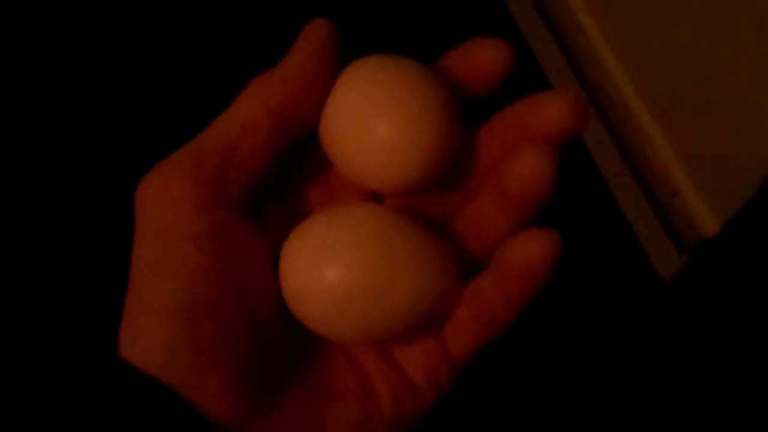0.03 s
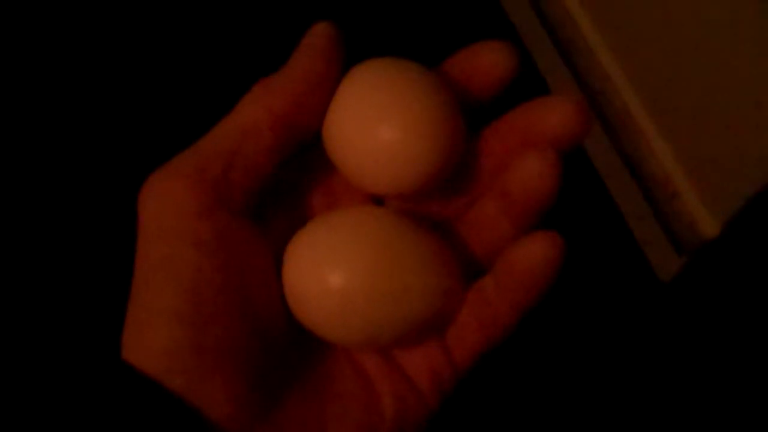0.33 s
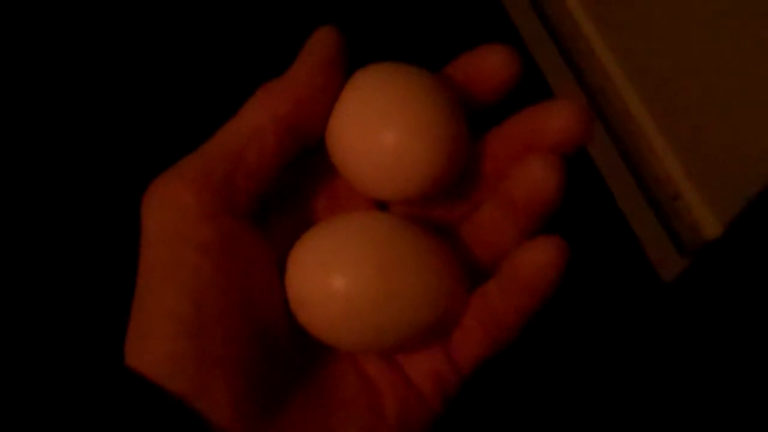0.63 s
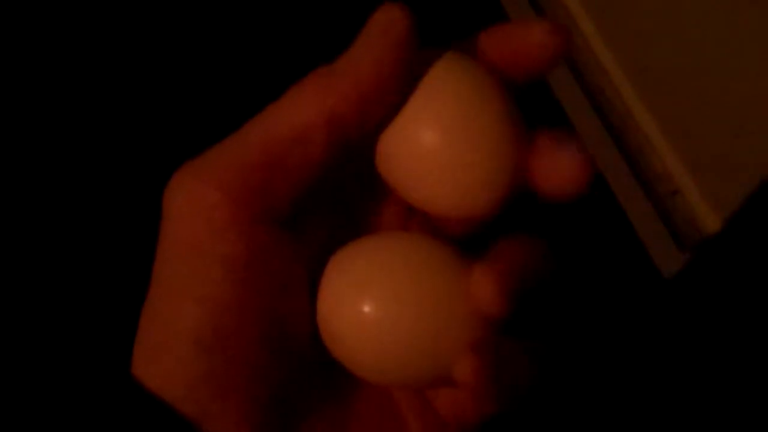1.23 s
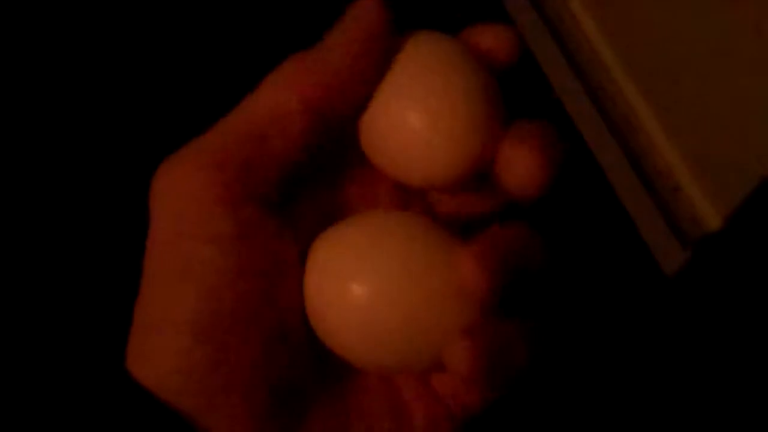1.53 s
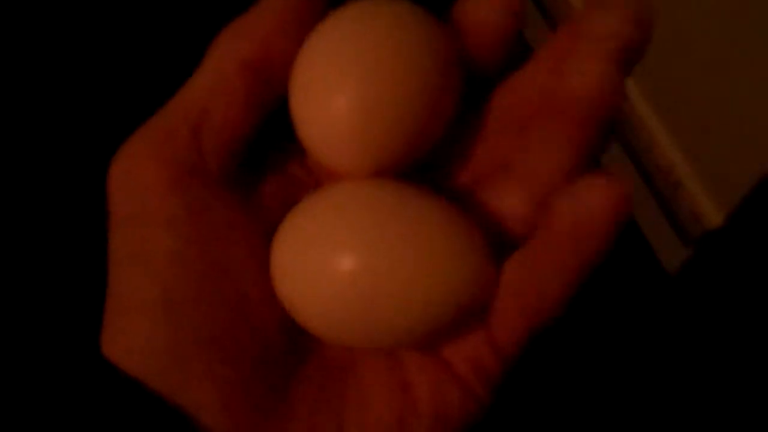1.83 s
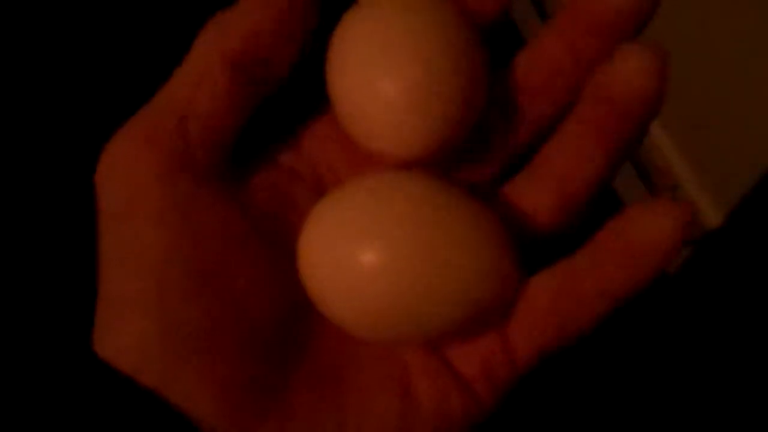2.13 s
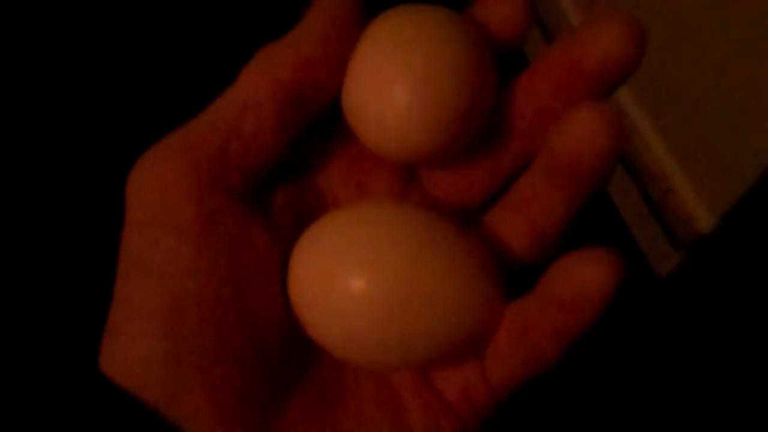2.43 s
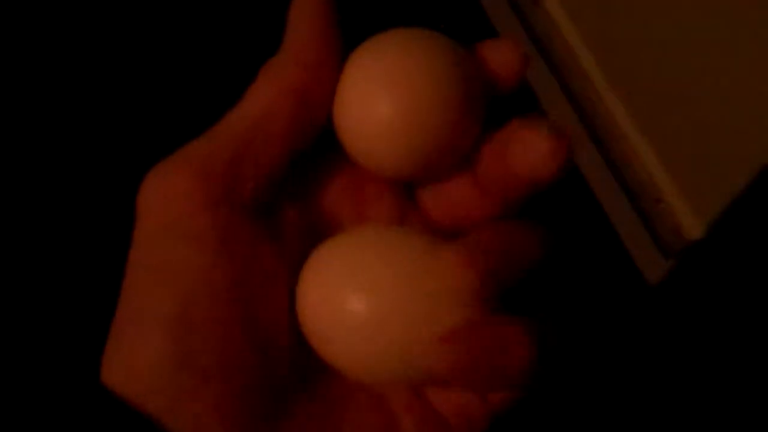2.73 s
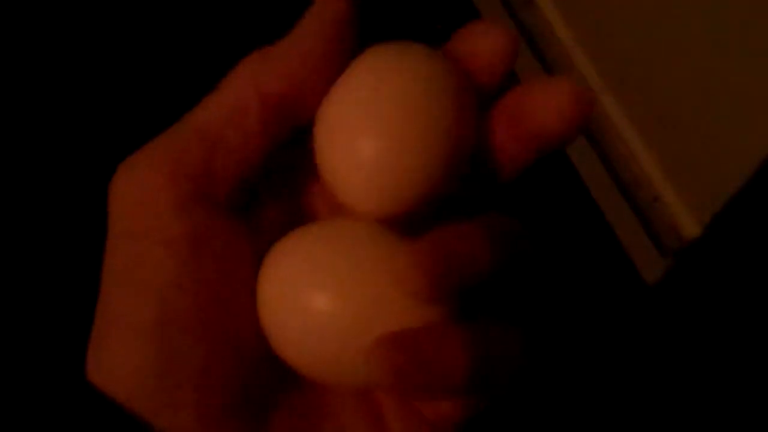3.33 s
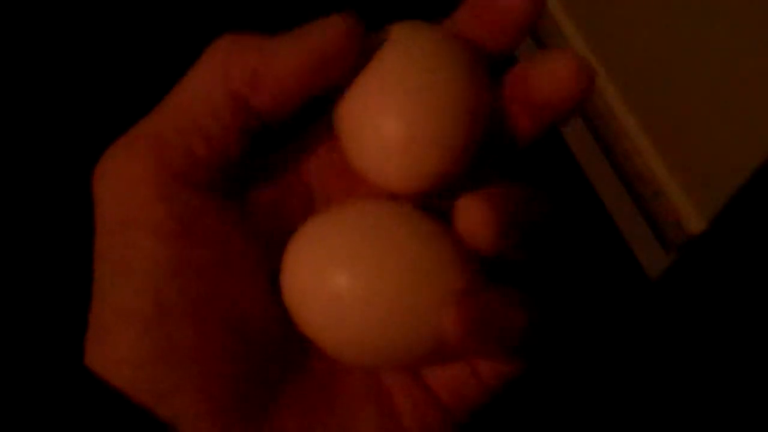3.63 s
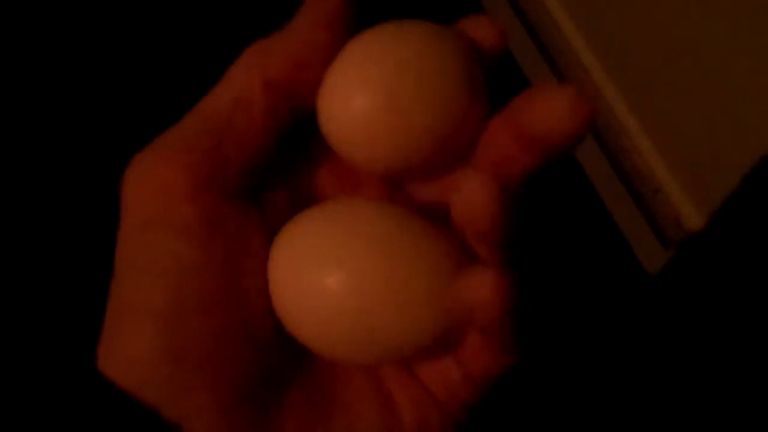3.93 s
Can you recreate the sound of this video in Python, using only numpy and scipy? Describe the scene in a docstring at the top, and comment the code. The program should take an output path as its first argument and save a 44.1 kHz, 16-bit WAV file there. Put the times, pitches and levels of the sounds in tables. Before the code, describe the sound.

Two eggs click together three times in a hand, with faint rubbing over quiet hiss.

```python
"""A small quiet room, two eggs rolled in one hand close to a stereo microphone.
From the start there is steady hiss, a motor's hum and, farther off, a faint squeak twice a second.
At 1.5 s the shells rub faintly; at 1.8 s they knock: a few quick contacts ring the damped shells and
come back from nearby surfaces. After a second knock at 2.5 s the eggs slide on and come to rest.
The hardest knock falls at 3.4 s, followed by one last rub."""
import sys
import numpy as np
from scipy import signal
from scipy.fft import rfft, irfft
from scipy.io import wavfile

SR = 44100
rng = np.random.default_rng(int(sys.argv[2]) if len(sys.argv) > 2 else 0)


def store_wav(level_fs):
    """Save 16-bit WAV to argv[1]."""
    pcm = np.round(np.clip(np.atleast_2d(level_fs), -1, 1) * 32767)
    wavfile.write(sys.argv[1], SR, pcm.T.astype(np.int16))


N = 176400
TIME = np.arange(N) / SR
FREQS = np.maximum(np.fft.rfftfreq(N, 1 / SR), 1)

# room tone, air noise and hiss: f/Hz, left density/dB, right density/dB
HISS_SPECTRUM = [(30, -92.5, -99), (70, -94.5, -99), (123, -89.5, -94), (162, -78, -81), (223, -84, -87),
                 (388, -74.5, -74.5), (586, -83, -83.5), (690, -79, -77), (1050, -79.5, -80.5),
                 (1170, -83, -82), (1810, -81, -84.5), (2850, -86.5, -88.5), (5750, -90, -93),
                 (6980, -83, -89), (7620, -81, -94.5), (8440, -93, -101), (10300, -102, -103.5),
                 (14200, -105, -106), (14600, -135, -135)]
# how alike the hiss is on the two sides: f/Hz, correlation (-1 to 1)
HISS_LIKENESS = [(60, 0.58), (130, 0.92), (640, 0.96), (1410, 0.54), (3100, -0.2), (6820, -0.43),
                 (12000, 0.069)]
# motor and mains in the background: f/Hz, level/dB, unsteady share (0 to 1), width/Hz, left-right/dB
HUM_TONES = [(99.9, -63.5, 0.11, 3, 4), (169.7, -50.5, 0.45, 7, 3.5), (200.8, -65.5, 0.6, 2.9, 0),
             (249, -65, 0.33, 8.2, 5), (337.5, -52.5, 0.32, 5.4, 3), (505, -61, 0.4, 3, 5),
             (744.5, -63, 0.83, 9.6, 2.5), (859, -60, 0.27, 12, 0), (901, -58.5, 0.77, 5.1, -0.5),
             (965, -59, 1, 9.3, -5.5)]
# something turning, farther off: middle t/s, length/s, level/dB, f/Hz
TURNING_SQUEAKS = [(.298, 0.031, -47, 1100), (0.812, 0.027, -40, 1082), (0.856, 0.018, -47, 1090),
                   (1.320, 0.013, -39.5, 1037), (1.346, 0.027, -50, 1044), (1.843, 0.035, -42, 1019),
                   (2.356, 0.031, -45, 1070), (2.865, 0.022, -42, 1057), (3.387, 0.032, -45, 1058),
                   (3.90, 0.055, -50.5, 1082)]
# surfaces near the microphone: delay/s, left level/dB, right level/dB
NEAR_ECHOES = [(.0078, -11, -14), (.0092, -18, -20), (0.0133, -23, -19)]
# left and right capsule: resonance f/Hz, width/Hz, boost/dB, level/dB, roll-off f/Hz
MIC_CAPSULES = [(7880, 1330, 9, -3, 19000), (6424, 1600, 5, -7, 10000)]
# shell rubs on shell or skin: middle t/s, length/s, level/dB, skin against shell/dB
RUB_STROKES = [(1.48, .035, -58, -15), (1.56, .018, -51.5, -18), (2.628, .004, -49, -12),
               (2.667, 0.021, -52, 0.5), (2.701, .004, -53, 7), (2.745, 0.029, -53.5, 2.5),
               (2.86, 0.06, -58, -6), (3.655, 0.023, -50.5, -18)]
# the eggs slide to rest after the second knock: start t/s, t60/s, level/dB, skin against shell/dB
SETTLING_SLIDES = [(2.53, .19, -42.5, -7), (2.54, 1.1, -54, -2)]
# what the eggs ring with: f/Hz, level/dB, t60/s
SHELL_MODES = [(680, -24, 0.005), (970, -17.7, 0.0037), (2000, -15.3, .0026), (3050, -21, 0.0058),
               (4310, -14, 0.0048), (4770, -17, 0.0053), (5970, -8, 0.0027), (7190, -9.5, 0.0055),
               (7890, -14.5, 0.005), (9560, -6.5, 0.0013), (10670, -14, 0.0035), (11663, -17, 0.0013)]
# shell meets shell, close up: t/s, level/dB, low modes/dB, top modes/dB, pitch factor
SHELL_CONTACTS = [(1.77991, -5.5, 3, -2, 0.94), (1.78102, -0.5, 4.5, -9.6, 0.96),
                  (1.78157, -8.5, 1, -5.4, .987), (2.52970, -17.5, -2, 17, 1), (2.531, -18, -4, 5, 1.1),
                  (2.5334, -19.5, -4, 7, 1), (2.5367, -1.5, -18, -19, .97), (2.5374, -17, -5, -8, 1.02),
                  (3.416091, -4, 11, 5, 1.025), (3.416246, 4, 1.4, 0, 1.049),
                  (3.417271, -0.5, 4.9, -4, 1.064)]

EARLY_DB, EARLY_T60_S, ROOM_DB, ROOM_T60_S, WALL_CUT_HZ = -12, 0.1, -14, 0.24, 3600
SQUEAK_ROOM_DB, SQUEAK_ROUGHNESS = -5, 0.4
RUB_GRAINS_PER_S, RUB_SPREAD_DB = 2500, 3
SHELL_RUB_HZ, SKIN_RUB_HZ = (5900, 8100), (2000, 3980)
GRIT_DB, GRIT_HZ = -8.5, (9000, 13500)  # the fine top of shell friction
LOW_MODES_HZ, TOP_MODES_HZ, HAND_CUT_HZ = 5000, 9500, 400
CRUNCH_DB, CRUNCH_T60_S, CRUNCH_HZ = -25, 0.004, (1490, 13000)  # level against the contact


def from_db(db):
    """Decibels to gain."""
    return 10 ** (np.asarray(db) / 20)


def rms_one(x):
    """Scale to rms 1."""
    return x / np.sqrt(np.mean(x ** 2) + 1e-20)


def over_hz(rows):
    """Spread a table's columns over all frequencies, on a log axis."""
    hz, *columns = np.transpose(rows)
    return np.array([np.interp(np.log(FREQS), np.log(np.sort(hz)), column) for column in columns])


def band(x, edges_hz):
    """Band-pass, rms 1."""
    return rms_one(signal.sosfilt(signal.butter(2, edges_hz, "band", fs=SR, output="sos"), x + 1e-18))


def drift(rate_hz):
    """Random wander, mostly slower than rate_hz, rms 1."""
    return rms_one(irfft(rfft(rng.standard_normal(N)) / (1 + (FREQS / rate_hz) ** 2), N))


def swell(middle, length):
    """A smooth rise and fall."""
    return np.exp(-2 * ((TIME - middle) / length) ** 2)


def fade(t, t60):
    """A sudden start at t = 0 and a steady decay."""
    return (t >= 0) * np.exp(-np.log(1000) * np.maximum(t, 0) / t60)


def hiss():
    """Room tone: smooth noise, alike on both sides in the bass and wide in the treble."""
    alike = over_hz(HISS_LIKENESS)[0]
    mid, side = rfft(rng.standard_normal((2, N)))
    pair = np.sqrt(1 + alike) * mid + np.sqrt(1 - alike) * side * np.array([[1], [-1]])
    return irfft(pair * from_db(over_hz(HISS_SPECTRUM)), N) * np.sqrt(SR) / 2


def motor_hum():
    """Motor and mains in the background: each tone has a steady part and a wavering part."""
    out = 0
    for hz, db, unsteady, width_hz, pan_db in HUM_TONES:
        phase = 2 * np.pi * (hz * TIME + rng.random())
        steady = np.sqrt(2 * (1 - unsteady ** 2)) * np.sin(phase)
        wavering = unsteady * (drift(width_hz) * np.sin(phase) + drift(width_hz) * np.cos(phase))
        out = out + from_db([[db + pan_db / 2], [db - pan_db / 2]]) * (steady + wavering)
    return out


def squeak(middle, length, db, hz, glide_hz_per_s=300, wobble_hz=38, wobbles_per_s=160):
    """A short, rough friction tone that glides and wobbles."""
    pitch = hz + glide_hz_per_s * (TIME - middle) + wobble_hz * drift(wobbles_per_s)
    tone = np.sin(2 * np.pi * np.cumsum(pitch) / SR)
    roughness = 1 + SQUEAK_ROUGHNESS * drift(rate_hz=140)
    return from_db(db) * swell(middle, length) * rms_one(roughness * tone)


def far_squeaks():
    """Something turning squeaks off in the room; once, a thin falling chirp sounds above it."""
    direct = sum(squeak(*row) for row in TURNING_SQUEAKS)
    direct += squeak(middle=0.814, length=0.026, db=-56.5, hz=4750,
                     glide_hz_per_s=-9000, wobble_hz=260, wobbles_per_s=700)
    return direct + from_db(SQUEAK_ROOM_DB) * diffuse(direct, ROOM_T60_S)


def diffuse(x, t60, build_s=0.0043):
    """Scattered reflections that build up and die away, different on each side."""
    t = TIME[:SR // 2]
    tail = rng.standard_normal((2, len(t))) * fade(t, t60) * (1 - np.exp(-t / build_s))
    tail /= np.sqrt(np.sum(tail ** 2) / 2)
    return signal.fftconvolve(x[None], tail, axes=1)[:, :N]


def small_room(x):
    """At the microphone: direct sound, a few near echoes, duller early scatter and a faint tail."""
    echoes = sum(from_db([[left_db], [right_db]]) * np.interp(TIME - delay, TIME, x)
                 for delay, left_db, right_db in NEAR_ECHOES)
    dull = signal.sosfilt(signal.butter(1, WALL_CUT_HZ, fs=SR, output="sos"), x)
    early = from_db(EARLY_DB) * diffuse(dull, EARLY_T60_S)
    tail = from_db(ROOM_DB) * diffuse(dull, ROOM_T60_S)
    return x + echoes + early + tail


def microphone(pair):
    """Each capsule has its own treble resonance, roll-off and level."""
    out = []
    for x, (hz, width_hz, boost_db, db, top_hz) in zip(pair, MIC_CAPSULES):
        resonance = signal.lfilter(*signal.iirpeak(hz, hz / width_hz, fs=SR), x)
        boosted = x + (from_db(boost_db) - 1) * resonance
        roll_off = signal.butter(2, top_hz, fs=SR, output="sos")
        out.append(from_db(db) * signal.sosfiltfilt(roll_off, boosted))
    return np.array(out)


def shell_rubs():
    """The grain of the shells catches in a dense run of tiny touches: bright on shell, duller on skin."""
    touches = (rng.random(N) < RUB_GRAINS_PER_S / SR) * rng.choice([-1, 1], N)
    grains = touches * from_db(RUB_SPREAD_DB * np.minimum(rng.exponential(1, N), 4))
    shell = band(grains, SHELL_RUB_HZ) + from_db(GRIT_DB) * band(grains, GRIT_HZ)
    skin = band(grains, SKIN_RUB_HZ)
    strokes = [(swell(middle, length), db, skin_db) for middle, length, db, skin_db in RUB_STROKES]
    strokes += [(fade(TIME - start, t60), db, skin_db) for start, t60, db, skin_db in SETTLING_SLIDES]
    return sum(from_db(db) * shape * (shell + from_db(skin_db) * skin) for shape, db, skin_db in strokes)


def egg_ring(t, low_db, top_db, pitch):
    """Damped shell modes: a firmer push brings out the low ones, a sharper touch the top ones."""
    out = 0
    for k, (hz, db, t60) in enumerate(SHELL_MODES):
        colour_db = low_db / (1 + (hz / LOW_MODES_HZ) ** 8) + top_db / (1 + (TOP_MODES_HZ / hz) ** 8)
        mode = fade(t, t60) * np.sin(2 * np.pi * hz * pitch * t)
        out = out + (-1) ** k * from_db(db + colour_db) * mode
    return signal.sosfilt(signal.butter(2, HAND_CUT_HZ, "high", fs=SR, output="sos"), out)


def egg_knocks():
    """Close up, the rough shells crunch at every contact and ring for a few milliseconds."""
    out = np.zeros(N)
    grit = band(rng.standard_normal(N), CRUNCH_HZ)
    for start, db, low_db, top_db, pitch in SHELL_CONTACTS:
        span = slice(int(start * SR), int(start * SR) + SR // 30)
        t = TIME[span] - start
        crunch = from_db(CRUNCH_DB + top_db / 2) * fade(t, CRUNCH_T60_S) * grit[span]
        out[span] += from_db(db) * (egg_ring(t, low_db, top_db, pitch) + crunch)
    return out


def scene():
    """Eggs close to the microphone; squeaks, hum and hiss behind."""
    squeaks = far_squeaks()
    eggs = microphone(small_room(egg_knocks() + shell_rubs()))
    return eggs + squeaks + motor_hum() + hiss()


def record(dry, full_scale=1.05, cutoff_hz=15700):
    """The hardest knock just clips; the top is cut steeply."""
    clipped = np.clip(dry, -full_scale, full_scale)
    return signal.sosfilt(signal.butter(20, cutoff_hz, fs=SR, output="sos"), clipped)


dry = scene()
out = record(dry)
store_wav(out)
```